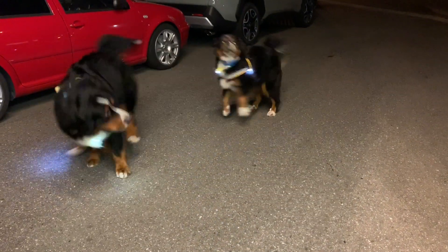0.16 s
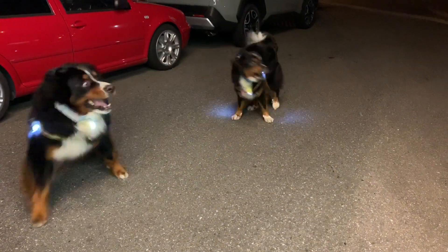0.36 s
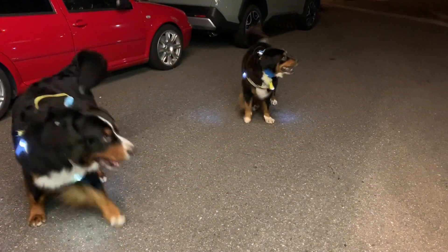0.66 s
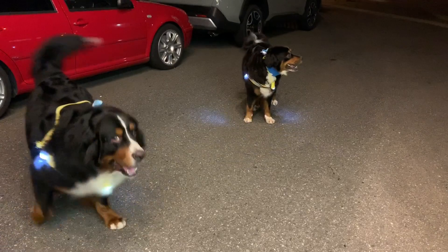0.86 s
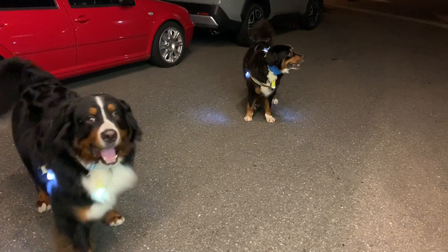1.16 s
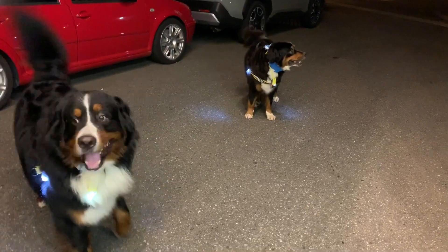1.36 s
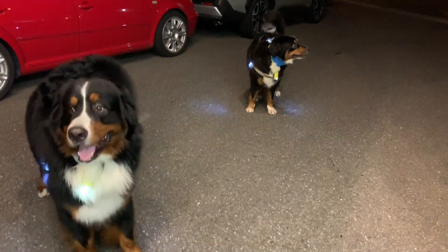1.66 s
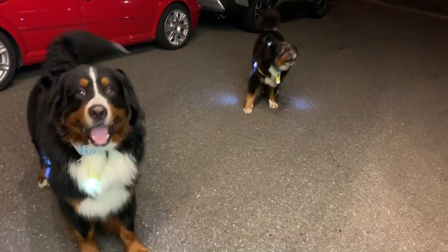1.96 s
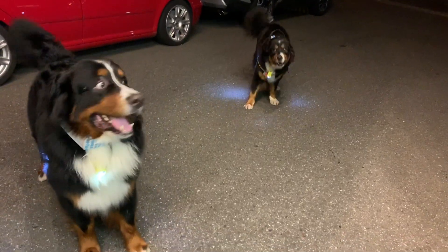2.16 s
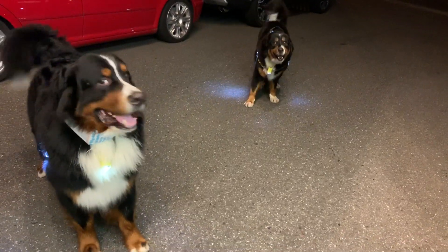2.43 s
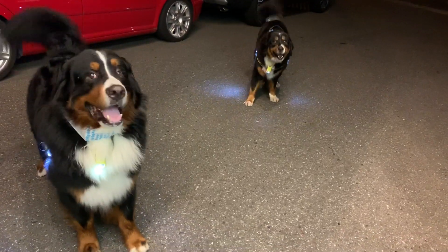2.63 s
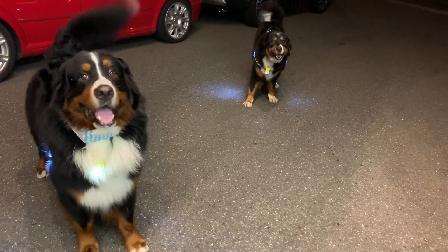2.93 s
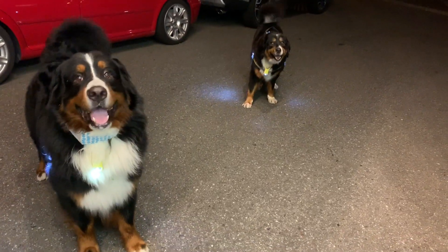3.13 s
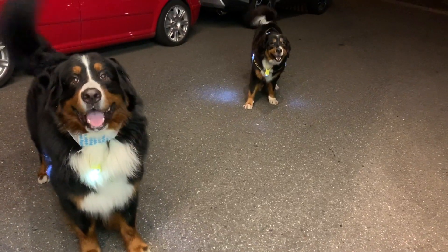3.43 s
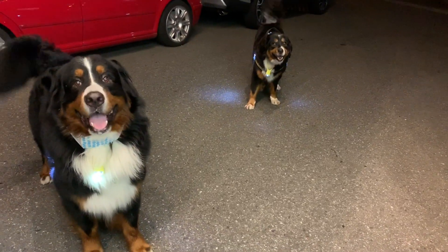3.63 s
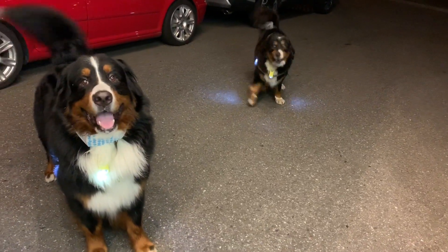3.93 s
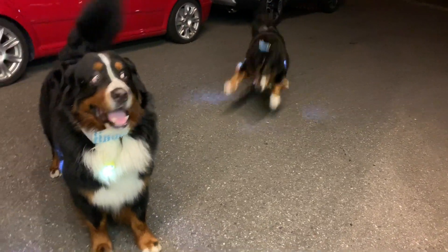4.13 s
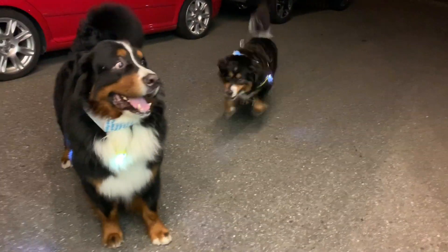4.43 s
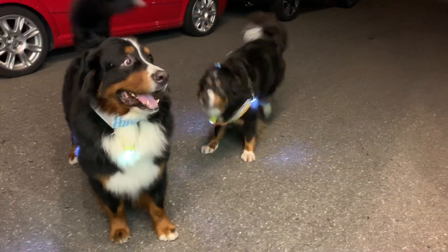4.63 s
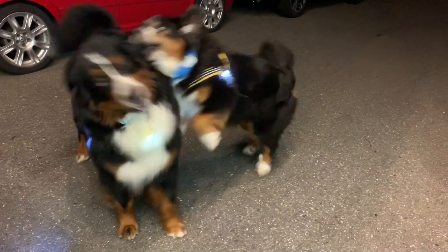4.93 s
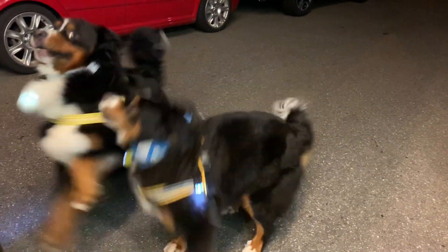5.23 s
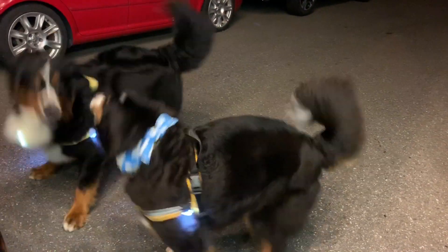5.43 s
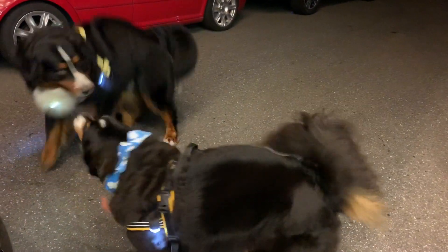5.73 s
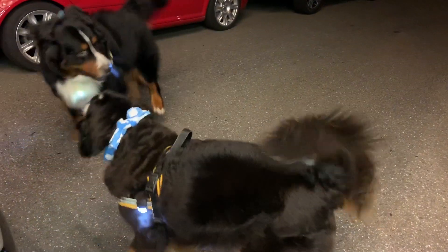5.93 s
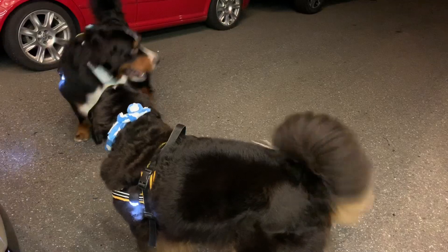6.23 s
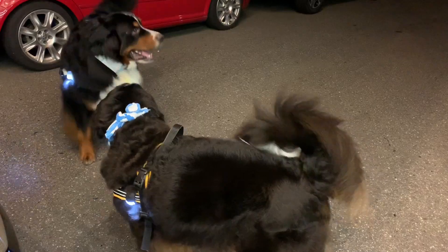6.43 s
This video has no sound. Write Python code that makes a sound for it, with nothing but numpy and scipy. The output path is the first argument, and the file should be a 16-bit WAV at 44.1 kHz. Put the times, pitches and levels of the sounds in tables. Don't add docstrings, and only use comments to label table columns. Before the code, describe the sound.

A large dog gives six loud, hoarse single barks close by on a paved yard at night, with tag clinks, claw ticks, scuffing paws and a faint distant dog answering.

```python
import sys
import numpy as np
from scipy import signal
from scipy.fft import rfft, irfft, next_fast_len
from scipy.io import wavfile
from scipy.ndimage import uniform_filter1d, minimum_filter1d, map_coordinates

SR = 44100
rng = np.random.default_rng(int(sys.argv[2]) if len(sys.argv) > 2 else 0)


def invert_db(level):
    return 10 ** (np.asarray(level, dtype=float) / 20)


def dump(signal):
    limited = np.clip(np.atleast_2d(signal).T, -1, 1)
    pcm = np.round(limited * 32767).astype(np.int16)
    wavfile.write(sys.argv[1], SR, pcm)


N = 290619

# (time [s], throat pitch [Hz], mouth pitch [Hz], muzzle opening [dB])
PITCH = [
    [(.063, 480, 780, -3.5), (.09, 485, 786, 0.5), (.105, 475, 908.4, -1), (.125, 530, 929.3, -2),
     (.16, 570, 940, 1.5), (.19, 565, 829.6, 1), (.212, 480, 903, -2), (.25, 520, 810, -1.5)],
    [(1.932, 500, 1144, -11), (1.965, 480, 1118, -2), (1.982, 620, 1002, 3), (2.005, 680, 1067, 1),
     (2.02, 720, 990, -0.5), (2.04, 660, 963, 3.5), (2.05, 600, 782, 2.5), (2.075, 560, 770, -6.5)],
    [(4.0, 600, 1048, -11), (4.028, 600, 1000, 1), (4.043, 520, 1040, 7), (4.058, 590, 1092, 1.5),
     (4.09, 610, 998.4, -0.5), (4.105, 610, 1038, -4), (4.135, 600, 904, -4), (4.148, 600, 895, -1.5)],
    [(4.538, 520, 1115, -7.5), (4.59, 509.6, 1030, -4), (4.63, 550, 1071, 2), (4.643, 570, 1005, -0.5),
     (4.678, 580, 1061, 2.5), (4.688, 575, 961, 5), (4.701, 560, 596, -0.5), (4.72, 500, 525, -4.5)],
    [(5.083, 400, 900.3, -9), (5.1, 500, 898.5, 2.5), (5.12, 610, 898, -5), (5.138, 560, 919, 4),
     (5.156, 580, 920.5, 1.5), (5.166, 590, 1031, -2), (5.21, 565, 897.8, 3.5), (5.255, 530, 675, 6.5)],
    [(5.776, 480, 1047, -13), (5.805, 465, 1040, 0), (5.822, 490, 950, -3), (5.85, 560, 949, 0.5),
     (5.864, 590, 920, 2), (5.88, 510, 900, 6.5), (5.895, 490, 792, 4), (5.935, 400, 761, -10)],
]
# (muzzle over effort [dB], hiss over muzzle [dB], chest push [dB],
# muzzle resonance [Hz], sum tones [dB])
COLOUR = [(-9.5, -14.5, -35, 1550, -3.5), (-4.5, -16, -27.5, 1500, -2), (-7.5, -13.5, -28.5, 1780, -1),
          (-7.5, -14, -36, 1850, -13), (-15, -13, -33, 1560, -0.5), (-17.5, -18, -40, 1450, 3)]


def unit(x):
    return x / np.sqrt(np.mean(np.abs(x) ** 2) + 1e-20)


def along(points, hz):
    f, v = np.transpose(points)
    return np.interp(np.log(hz + 1), np.log(f + 1), v)


def curves(rows):
    s, *cols = np.transpose(rows)
    return [np.interp(np.arange(N) / SR, s, c) for c in cols]


def played(tables, edge):
    t = np.arange(N) / SR
    gate = sum(np.clip(np.minimum(t - rows[0][0], rows[-1][0] - t) / edge + 1, 0, 1) for rows in tables)
    return [np.minimum(gate, 1)] + curves(np.concatenate(tables))


def wobble(rate):
    return map_coordinates(rng.standard_normal(int(N * rate / SR) + 4), [np.arange(N) * rate / SR])


def filtered(x, response):
    m = next_fast_len(N + SR // 2)
    return irfft(rfft(x, m) * response(np.fft.rfftfreq(m, 1 / SR)), m)[..., :N]


def noise(spectrum, channels=1):
    return unit(filtered(rng.standard_normal((channels, N)), lambda hz: invert_db(along(spectrum, hz))))


def patchy(x, depth_db):
    z = signal.stft(x, nperseg=256)[2]
    field = rng.standard_normal(z.shape[-2:])
    field = uniform_filter1d(uniform_filter1d(field, size=3, axis=0), size=7, axis=1)
    return unit(signal.istft(z * invert_db(depth_db * unit(field)), nperseg=256)[1][..., :N])


def panned(x, db):
    return x * invert_db(np.outer([.5, -.5], db))


def ports(x, phase):
    return filtered(x, lambda hz: np.exp(.5j * np.outer([1, -1], along(phase, hz))))


def add(track, s, sound):
    start = round(s * SR)
    track[:, start:start + sound.shape[-1]] += sound


def town():
    # (time [s], level [dB])
    traffic = [(0.0, -41.5), (0.86, -44), (1.03, -45), (3.63, -40.5), (5.97, -47.5), (6.59, -53)]
    # (frequency [Hz], density [dB per Hz])
    rumble = [(12, -30), (20, -8), (65, -2), (113, -14.5), (255, -21), (377, -30), (499, -25), (558, -30),
              (923, -29), (1710, -38), (2530, -39.5), (8000, -62.5), (14000, -68), (15500, -73),
              (16200, -92)]
    # (frequency [Hz], correlation [-1 to 1])
    likeness = [(60, 0.99), (240, 0.82), (950, -0.047), (3770, -0.34), (15000, -0.62)]
    # (frequency [Hz], left-right [dB])
    balance = [(60, -3.5), (380, -1.5), (2380, 1.5), (15000, -7.5)]
    turn = lambda hz: np.arccos(np.clip(along(likeness, hz), -1, 1)) / 2
    mid, side = filtered(noise(rumble, channels=2), lambda hz: np.array([np.cos(turn(hz)), np.sin(turn(hz))]))
    pair = filtered(np.array([mid + side, mid - side]), lambda hz: panned(1, along(balance, hz)))
    sway_db = 0.6 * wobble(1.2)
    return invert_db(curves(traffic)[0] + 3.0 + sway_db) * unit(pair)


def far_dog():
    # (start [s], length [s], pitch [Hz], level [dB])
    answers = [
        (0.511, .14, 370.1, -45),
        (0.864, 0.15, 398.5, -49),
        (1.221, 0.13, 380, -46.5),
        (1.611, 0.16, 386, -57),
        (6.269, 0.154, 377, -55),
    ]
    # (frequency [Hz], level [dB])
    far_throat = [(250, -25), (400, 7.5), (800, -1), (1150, 4.5), (1500, -11.5), (2200, -11.5),
                  (3500, -32.5)]
    calls = []
    for s, length, hz, db in answers:
        peak_s = s + 0.51 * length
        calls.append([(s, hz, db - 5.5), (peak_s, hz, db), (s + length, hz * 1.04, db - 25)])
    on, hz, db = played(calls, edge=0.0079)
    phase = 2 * np.pi * np.cumsum(hz * (1 + 0.0041 * wobble(50))) / SR
    stack = sum(invert_db(along(far_throat, k * hz) + 6.2 * wobble(34.0)) * np.sin(k * phase) for k in range(1, 7))
    return on * invert_db(db + 4.5) * (0.34 * stack + 0.84 * noise(far_throat)[0])


def yard(x, tail_db):
    # (frequency [Hz], t60 [s])
    decay = [(300, 1), (1000, 0.88), (2500, 0.73), (6000, 0.7), (14000, 0.31)]
    # (delay [s], level [dB])
    walls = [(.004, -13.5), (.012, -16.5), (.045, -22.5), (.09, -26), (.14, -32), (.19, -40.5),
             (.27, -41.5)]
    hz, t, z = signal.stft(rng.standard_normal((2, SR)), SR, nperseg=256)
    fade = invert_db(-60 * t / along(decay, hz)[:, None])
    tail = signal.istft(z * fade * (1 + hz[:, None] / 2500), SR, nperseg=256)[1]
    tail = tail * invert_db(3 * np.array([wobble(25), wobble(25)])[:, :tail.shape[1]])
    tail = invert_db(tail_db) * tail / np.linalg.norm(tail[0])
    for s, db in walls:
        add(tail, s, invert_db(db - 33) * unit(uniform_filter1d(rng.standard_normal((2, 600)), size=7)))
    return signal.fftconvolve(x[None], tail, axes=1)[:, :N]


def paws():
    # (time [s], grit level [dB], coat level [dB], t60 [s])
    scuffs = [(0, -53, -44.5, 2.3), (.27, -48.5, -41.5, 1.1), (.36, -51, -56, 0.27),
              (.54, -53.5, -42, 0.31), (0.619, -90, -47, 0.079), (.655, -76, -69, 0.37),
              (.86, -74.5, -65, .2), (.94, -67, -54, 1), (1.05, -56.5, -49, 0.21), (1.31, -79.5, -49, 0.12),
              (1.364, -62, -76, 0.25), (1.61, -67, -49, 0.29), (4.17, -45, -36, 1.25),
              (4.397, -51, -57, 0.076), (4.42, -63, -60.5, 0.37), (4.74, -48.5, -27, 0.098),
              (4.77, -49.5, -37, 0.63), (4.908, -49.5, -40.5, 3.4), (5.268, -34.5, -27, 0.41),
              (5.451, -59.5, -46, 3.8), (5.677, -47, -43, 0.11), (5.95, -56.5, -44, 0.52),
              (6.057, -55.5, -68, 0.31), (6.191, -61, -53, 0.047), (6.45, -75, -78.5, .2)]
    # (frequency [Hz], density [dB per Hz])
    grit_tone = [(1500, -29), (2500, -19.5), (5700, -10), (8600, -6.5), (11000, -7), (14000, -10),
                 (16000, -22)]
    # (frequency [Hz], density [dB per Hz])
    coat_tone = [(110, -25.5), (180, -6.5), (665, -3.5), (775, -4), (891, -8), (1370, -10), (5000, -27),
                 (6500, -58.5), (11000, -120)]
    t = np.arange(N) / SR
    rise_db_per_s = 394
    fades = [invert_db(-np.maximum(rise_db_per_s * (s - t), 60 * (t - s) / t60)) for s, _, _, t60 in scuffs]
    grit, coat = np.sqrt(invert_db(np.transpose(scuffs)[1:3]) ** 2 @ np.square(fades))
    clumps = invert_db(3 * wobble(35) + 2.5 * wobble(400)) * (noise(grit_tone) + .3 * noise(grit_tone, channels=2))
    rustle = invert_db(4 * wobble(25)) * (noise(coat_tone) + .6 * noise(coat_tone, channels=2))
    clumps = patchy(unit(clumps), depth_db=3)
    rustle = patchy(unit(rustle), depth_db=4)
    return grit * clumps + coat * rustle


def thuds():
    # (time [s], peak [dB], pitch [Hz])
    landings = [(4.293, -31, 66.92), (4.318, -30, 62.6), (4.301, -37, 379), (4.323, -43.5, 339),
                (4.901, -41, 62), (4.951, -40, 297), (5.04, -40, 220.7), (5.318, -34.5, 73.4)]
    out, t = np.zeros((2, N + SR)), np.arange(SR // 3) / SR
    for s, db, hz in landings:
        strike = invert_db(db + 11.0 - 60 * t / 0.058) * (1 - np.exp(-t / 0.00053))
        add(out, s, strike * np.sin(2 * np.pi * hz * t) * np.ones((2, 1)))
    return out[:, :N]


def claws():
    # (time [s], peak [dB], centre [Hz], left-right [dB])
    ticks = [(0.3975, -30.5, 13200, 5), (1.6357, -41.5, 3470, 1), (1.726, -44.5, 2520, 0),
             (2.8057, -62, 3500, 0), (3.0142, -58, 3500, 0), (3.1344, -53, 4930, 2), (4.001, -42, 5480, -1),
             (4.2884, -27, 5970, 2.5), (4.3184, -31, 4344, -4), (4.3953, -25.5, 7040, -6),
             (4.4483, -31, 6850, -6), (4.857, -30, 8440, -1), (4.9064, -37, 5500, 2),
             (5.043, -35.5, 8530, 1), (5.088, -25.5, 9000, -0.5), (5.455, -27.5, 6780, 3),
             (5.663, -38, 4360, -5), (6.0177, -42, 13400, 0), (6.1489, -49, 6445, 8),
             (6.5141, -47, 6800, -3)]
    out, t = np.zeros((2, N + SR)), np.arange(SR // 3) / SR
    for s, db, hz, pan_db in ticks:
        snap = rng.standard_normal(len(t)) * invert_db(-60 * t / 0.016)
        band = np.clip([hz / 1.7, hz * 2.2], 500, 16000)
        snap = signal.sosfilt(signal.butter(2, band, "bandpass", fs=SR, output="sos"), snap)
        add(out, s, panned(invert_db(db) * snap / np.abs(snap).max(), pan_db))
    return out[:, :N]


def tags():
    # (time [s], peak [dB], low modes [dB], high modes [dB], share of the free ringing time)
    strikes = [(0.0438, -40, -12.5, -7.5, .7), (0.3456, -26.5, -26, -14, .7),
               (0.3696, -41.5, -8, -11, 0.58), (0.6449, -32, -18.5, -17.5, .6),
               (0.6993, -55, -14, -1.5, 0.76), (0.7991, -56, -10, -11.5, 0.36),
               (0.848, -45.5, -14, -1.5, 0.41), (0.936, -52, -20, -3.5, 0.96), (1.1134, -64, -14, -27, .9),
               (1.3359, -50, -16, -5, 0.6), (1.3628, -40.5, -17.5, -7.5, 1), (5.662, -43, -18, -16.5, .6),
               (5.9658, -42.5, -22, -14, .9), (6.1494, -46, -25, -21, 0.29),
               (6.1835, -42, -10, -12.5, 0.39)]
    # (frequency [Hz], level [dB], t60 [s])
    modes = [(6420, -4, 0.2), (7250, -0.5, 0.28), (13200, -4, 0.1), (13490, -0.5, 0.08),
             (15700, -11.5, 0.065)]
    out, t = np.zeros((2, N + SR)), np.arange(SR // 3) / SR
    for s, db, low_db, high_db, free in strikes:
        ring = 0
        for hz, mode_db, t60 in modes:
            mode_db = mode_db + (low_db if hz < 1e4 else high_db) + rng.normal(0, 3, (2, 1))
            drift = np.cumsum(rng.normal(0, .03, len(t)))
            phase = 2 * np.pi * (hz * t + .25 * rng.random((2, 1))) + drift
            ring = ring + invert_db(mode_db - 60 * t / (free * t60)) * np.sin(phase)
        click = 0.2 * invert_db(-60 * t / 0.0032) * np.diff(rng.standard_normal((2, len(t) + 1)))
        add(out, s, invert_db(db + 5.0) * (ring + click))
    return out[:, :N]


def buckle():
    # (time [s], peak [dB], pitch [Hz])
    knocks = [(4.398, -38, 7027), (4.419, -52, 4290), (4.4744, -41, 4260), (4.4942, -46, 4280),
              (4.5356, -37, 4260), (4.771, -35.5, 4300), (4.803, -39.5, 4420), (4.812, -38.5, 3610),
              (4.822, -39.5, 4294), (4.842, -39.5, 4190), (4.892, -40, 4330)]
    out, t = np.zeros((2, N + SR)), np.arange(SR // 3) / SR
    for s, db, hz in knocks:
        drift = np.cumsum(rng.normal(0, 0.099, (2, len(t))), axis=1)
        swell = invert_db(db + 2.5 - 60 * t / 0.07) * np.minimum(t / 0.0018, 1)
        add(out, s, swell * np.sin(2 * np.pi * hz * t + drift))
    return out[:, :N]


def pant():
    # (time [s], level [dB])
    puff = [
        (4.893, -47.5),
        (4.915, -40),
        (5.055, -40.5),
        (5.072, -54),
    ]
    # (frequency [Hz], density [dB per Hz])
    open_throat = [(300, -41.5), (680, -11.5), (780, 8), (900, -12), (1400, -1), (2300, -15), (3200, -11),
                   (3900, -33.5)]
    on, db = played([puff], edge=0.0047)
    return on * invert_db(db + 3.62 * wobble(60)) * (noise(open_throat) + 0.48 * noise(open_throat, channels=2))


def locked(hz, chaos, width_hz, jitter):
    phase = 2 * np.pi * np.cumsum(hz * (1 + jitter * wobble(90))) / SR
    a, b = filtered(rng.standard_normal((2, N)), lambda f: 1 / (1 + 1j * f / width_hz) ** 2)
    swing = np.sqrt(1 - chaos) + np.sqrt(chaos) * unit(a + 1j * b)
    return swing * np.exp(1j * phase), phase


def controls():
    hoarseness = [0, .25, .05, 0, 0, .08]
    colour = []
    for rows, (db, hiss_db, _, muzzle_hz, sum_db), hoarse in zip(PITCH, COLOUR, hoarseness):
        colour += [(rows[0][0], db, hiss_db, hoarse, muzzle_hz, sum_db),
                   (rows[-1][0], db - 5.5, hiss_db + 3.5, hoarse, muzzle_hz * (1 - .08), sum_db)]
    glides = [uniform_filter1d(c, size=260) for c in curves(np.concatenate(PITCH))]
    return glides + curves(colour)


def efforts():
    # (time [s], effort [dB], lean of the mouth over the throat [dB])
    surges = [
        [(.086, -15, -0.5), (.112, -5.5, -9.5), (.15, -10.5, 5.5), (.188, -13.5, -2.5), (.213, -18, -3),
         (.25, -27.5, -1.5)],
        [(1.963, -10.5, -7), (1.987, -13, -2), (2.022, -13.5, 5.5), (2.04, -18, 2), (2.051, -15.5, -2.5),
         (2.075, -20, 1)],
        [(4.028, -15.5, -1), (4.046, -6.5, 2), (4.088, -6.5, -3.5), (4.105, -12, 10), (4.132, -7.5, 12),
         (4.148, -32, 3.5)],
        [(4.595, -7.5, -6), (4.638, -5.5, 13.5), (4.655, -11.5, 13), (4.682, -16, 19.5), (4.703, -7.5, -16.5),
         (4.72, -28.5, 2.5)],
        [(5.106, -3.5, -26.5), (5.124, -8.5, -3), (5.155, -7, -16), (5.195, -9, -12), (5.232, -13.5, -6),
         (5.255, -29, -1.5)],
        [(5.8, -17.5, -8), (5.822, -2.5, -11), (5.855, -11, 0.5), (5.885, -13, -1), (5.905, -15, -0.5),
         (5.935, -31.5, 1.5)],
    ]
    barks = [[(bark[0][0], -35, -6)] + rows for bark, rows in zip(PITCH, surges)]
    return played(barks, edge=0.0047)


def fold_tones(low, high, sum_db):
    squares = invert_db(sum_db) * low * high + invert_db(-8.0) * high ** 2
    cubes = invert_db(-22.5) * low ** 3 + invert_db(-33.5) * high ** 3
    crossed = invert_db(-7.0) * low ** 2 * high + invert_db(-12.5) * low * high ** 2
    return squares + cubes + crossed


def fleeting():
    # (time [s], half length [s], pitch [Hz], glide [Hz per s], level [dB])
    flares = [(0.122, 0.0072, 1940, 1495, -19.5), (0.131, 0.0076, 2626, -2, -29.5),
              (.098, .01, 4900, -2000, -45), (.207, 0.011, 505, -4000, -18), (.21, 0.0048, 950, -1, -20.5),
              (1.972, 0.011, 1225, -2000, -19.5), (2.049, 0.0062, 746, 3, -18.5),
              (4.04, 0.011, 4750, 1, -38), (4.042, 0.011, 2600, 0, -31), (4.05, .01, 2105, 0, -29),
              (4.1, .012, 2130, -3000, -32), (4.091, .012, 1630, -2000, -21),
              (1.975, 0.014, 2538, 2000, -26.5), (2.0, 0.024, 1815, -1500, -21.5),
              (2.019, 0.003, 1460, 0.5, -27.5), (4.589, 0.02, 728, 1998, -22.5),
              (4.624, 0.0097, 806, 2999.5, -13), (4.619, .006, 1800, 2997, -24.5),
              (4.69, .007, 1766, -8000, -22.5), (5.167, 0.0066, 696.4, -2000, -16.5),
              (5.171, .01, 1017, -3000, -22.5), (5.195, .02, 2000, 2999, -26.5),
              (5.135, .01, 2500, 0, -36.5), (5.18, .012, 2940, 3000, -34.5),
              (5.212, 0.013, 3100, -1, -33.5), (5.25, .014, 3090, 0, -37.5),
              (5.234, .008, 720, -4000, -18.5), (5.792, 0.0079, 580, 5998.5, -24.5),
              (5.821, 0.0055, 1410, -0.5, -24), (5.878, .016, 1401, -4000, -23.5),
              (5.907, 0.013, 580, -7000, -19)]
    out, t = np.zeros((1, N)), np.arange(-SR // 16, SR // 16) / SR
    for s, length, hz, glide, db in flares:
        swell = invert_db(db) * np.exp(-(t / length) ** 2)
        add(out, s - 1 / 16, swell * np.sin(2 * np.pi * (hz + glide * t / 2) * t))
    return out[0]


def breath(cycle, beat):
    # (frequency [Hz], density [dB per Hz])
    hiss = [(1500, -27.5), (2300, -0.5), (2800, -13.5), (3300, -16), (4000, -20), (4800, -11.5),
            (5700, -18.5), (7700, -14.5), (9200, -17.5), (10500, -24), (13400, -19.5), (16000, -31)]
    pulsed = (1 + 0.21 * np.cos(cycle)) * (1 + .5 * np.cos(beat))
    air = unit(filtered(pulsed * rng.standard_normal(N), lambda f: invert_db(along(hiss, f))))
    return patchy(air, depth_db=5)


def chest_push(cycle):
    t = np.arange(N) / SR
    push = sum(invert_db(row[2]) * np.exp(-((t - bark[0][0] - 0.037) / 0.018) ** 2) for bark, row in zip(PITCH, COLOUR))
    return push * np.cos(.42 * cycle)


def dog():
    # (time [s], half length [s], throat change [dB], mouth change [dB])
    breaks = [(0.109, 0.025, -6.5, 1), (0.164, 0.0012, -19, -31), (0.208, 0.0019, -42, -14.5),
              (0.212, 0.0015, 3.5, 1), (1.97, 0.00067, -16, 20.5), (4.669, 0.005, 10.5, -15),
              (4.678, 0.0081, -4.5, 7.5), (4.062, 0.011, 2.5, -1.5), (4.128, 0.012, -13.5, 0),
              (4.622, 0.0073, -2.5, -10), (4.694, 0.0019, -23, -17), (5.133, 0.0052, -11, 5),
              (5.174, 0.0084, -13.5, 7.5), (5.834, 0.0041, -5, -9), (5.87, 0.0035, -6.5, -10)]
    nose_levels = [-14.5, -13, -22, -22, -7, -18]
    t = np.arange(N) / SR
    low_hz, high_hz, open_db, muzzle_db, hiss_db, hoarse, muzzle_hz, sum_db = controls()
    on, effort_db, lean_db = efforts()
    low_db = effort_db - 10 * np.log10(1 + invert_db(2 * lean_db))
    high_db = low_db + lean_db
    db = uniform_filter1d(effort_db, size=900) + muzzle_db + open_db
    loose = .05 + hoarse + np.clip((-13 - effort_db) / 25, 0, .5)
    throat_chaos = np.clip(loose + .42 / (1 + invert_db(-2 * lean_db - 8)), 0, 1)
    mouth_chaos = np.clip(loose + .42 / (1 + invert_db(4 * lean_db - 12)), 0, 1)
    for s, length, throat_db, mouth_db in breaks:
        dip = np.exp(-((t - s) / length) ** 2)
        low_db = low_db + throat_db * dip
        high_db = high_db + mouth_db * dip
        db = db + mouth_db / 2 * dip

    low, cycle = locked(low_hz, throat_chaos, width_hz=100, jitter=.018)
    high, beat = locked(high_hz, mouth_chaos, width_hz=110, jitter=.015)
    rough = locked(muzzle_hz, .6, width_hz=170, jitter=.03)[0]
    upper = .5 * fold_tones(low, high, sum_db) + .8 * rough
    voice = np.sqrt(2) * np.real(invert_db(low_db) * low + invert_db(high_db) * high + invert_db(db) * upper + fleeting())
    voice = filtered(voice, lambda f: 1 / (1 + (f / 3300) ** 8))

    air = on * invert_db(db + hiss_db + 0.38 * wobble(45))
    leak = 1 / (0.014 * SR)
    exhaled = np.maximum(air, signal.lfilter([leak], [1, leak - 1], air))
    voice = on * voice + exhaled * breath(cycle, beat)
    nose_db = np.interp(t, [bark[3][0] for bark in PITCH], nose_levels)
    nose = np.real(locked(1.55 * muzzle_hz, .8, width_hz=300, jitter=.04)[0])
    voice = voice + on * invert_db(db + nose_db) * nose
    steep = lambda f: (1j * f / 330) ** 4 / (1 + 1j * f / 330) ** 4
    return filtered(voice * invert_db(5.5), steep) + chest_push(cycle)


def scene():
    # (time [s], left-right [dB], share sent to the yard [dB])
    facing = [(.15, -1.5, 1), (2, -1.5, 2.5), (4.08, -2.5, 1), (4.62, 1, -1), (5.17, 2.5, -0.5),
              (5.85, 1.5, -4)]
    # (frequency [Hz], left-right [dB])
    head_balance = [(300, -0.5), (560, -4), (760, -4.5), (1000, 2), (1400, 1), (2800, 3.5), (5500, -7),
                    (10000, 0.5)]
    # (frequency [Hz], left lead [rad])
    from_right = [(200, 0.5), (600, 0.62), (1030, -1.3), (1500, -0.3), (2100, -1.5), (2500, -4.5),
                  (4500, -5), (6500, -6)]
    # (frequency [Hz], left lead [rad])
    from_left = [(200, 0.5), (600, 0.43), (1030, 1.25), (1500, 1.34), (1900, 2.5), (2600, 2), (3600, 4.5),
                 (4800, 4), (6500, 6.5)]
    voice = dog()
    moved = np.arange(N) > 4.95 * SR
    direct = ports(voice * ~moved, from_right) + ports(voice * moved, from_left)
    direct = filtered(direct, lambda hz: panned(1, along(head_balance, hz)))
    pan_db, sent_db = curves(facing)
    near = panned(direct, pan_db) + yard(voice * invert_db(sent_db), tail_db=-14.5)
    far = far_dog()
    far = 0.68 * far + yard(far, tail_db=-0.5)
    contacts = claws() + tags() + buckle() + thuds()
    return near + far + paws() + contacts + town() + pant()


def thinned(x):
    # (from [s], to [s], low edge [Hz], high edge [Hz])
    gaps = [(.09, .18, 3620, 3800), (.12, .15, 4100, 4500), (.145, .22, 4400, 4850),
            (.165, .24, 3250, 3480), (1.94, 1.98, 3280, 3500), (1.96, 2.05, 3550, 3900),
            (1.98, 2.03, 4300, 4550), (4.0, 4.05, 3800, 4130), (4.0, 4.045, 3280, 3500),
            (4.06, 4.12, 3780, 3900), (4.04, 4.13, 2950, 3120), (4.24, 4.28, 3700, 4250),
            (4.53, 4.58, 3350, 3500), (4.925, 5.0, 5300, 5650), (4.925, 4.96, 6300, 6600),
            (4.61, 4.66, 3100, 3300), (4.655, 4.7, 3600, 3780), (4.67, 4.7, 4000, 4200),
            (5.055, 5.08, 4600, 5700), (5.09, 5.18, 3230, 3450), (5.112, 5.235, 3450, 5170),
            (5.17, 5.25, 5170, 5520), (5.79, 5.885, 3050, 3680), (5.885, 5.93, 3430, 3850),
            (5.82, 5.87, 4400, 4900)]
    hz, t, z = signal.stft(x, SR, nperseg=1024)
    chance = unit(uniform_filter1d(rng.standard_normal((129, len(t))), size=5, axis=1))
    chance = np.repeat(chance, 4, axis=0)[:513]
    hollow = np.zeros((len(hz), len(t)), bool)
    for start, end, low, high in gaps:
        hollow |= np.outer((hz > low) & (hz < high), (t > start - .01) & (t < end + .01))
    return signal.istft(z * (1 - .98 * (hollow & (chance > -1.7))), SR, nperseg=1024)[1][:, :N]


def band_limit(x):
    return signal.sosfilt(signal.butter(12, 16360, fs=SR, output="sos"), x)


def record(dry):
    # (frequency [Hz], left lead [rad])
    port_phase = [(7500, 0), (8500, -1), (9500, -2.3), (10000, -3), (10900, -3.3), (12000, -4.8),
                  (13000, -6), (14000, -6.3)]
    left, right = ports(dry, port_phase)
    mid = filtered(left + right, lambda hz: 1 - 0.73 * np.exp(-((hz - 10400) / 700) ** 4))
    side = left - right
    x = filtered(np.array([mid + side, mid - side]) / 2, lambda hz: 1 / (1 + (hz / 15900) ** 60))
    need = np.minimum(1, .96 / (np.abs(x).max(axis=0) + 1e-9))
    gain = minimum_filter1d(need, size=501)
    gain = uniform_filter1d(uniform_filter1d(gain, size=251), size=251)
    mix = thinned(x * gain)
    return band_limit(mix)


dry = scene()
out = record(dry)
dump(out)
```